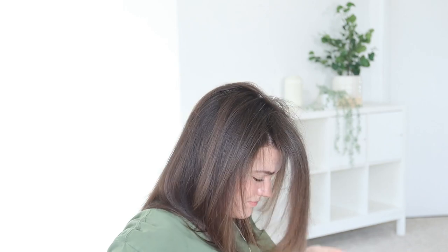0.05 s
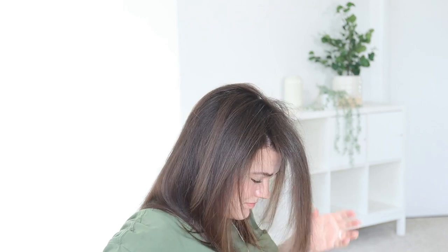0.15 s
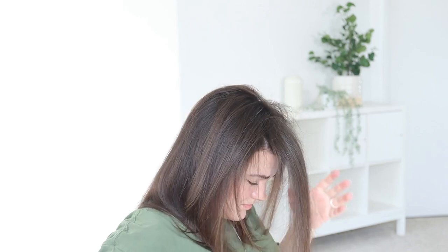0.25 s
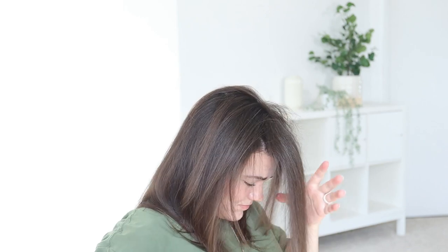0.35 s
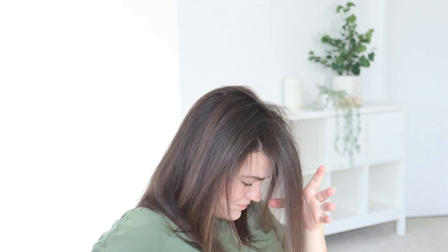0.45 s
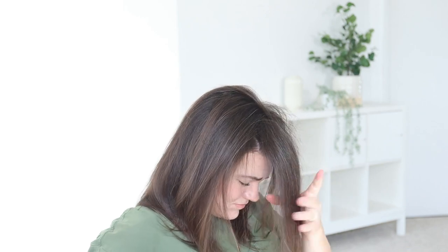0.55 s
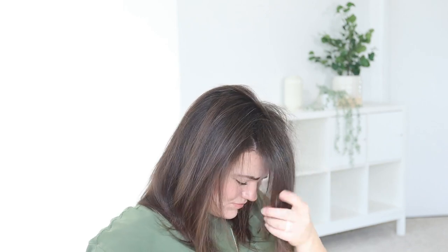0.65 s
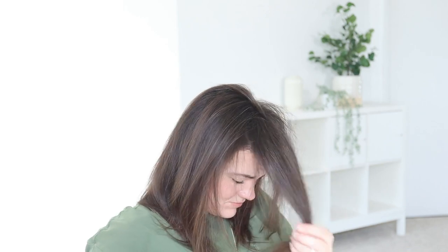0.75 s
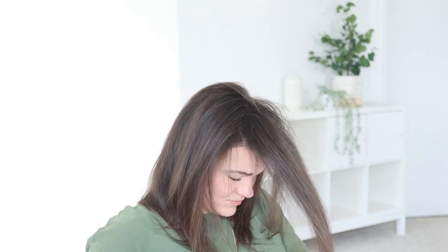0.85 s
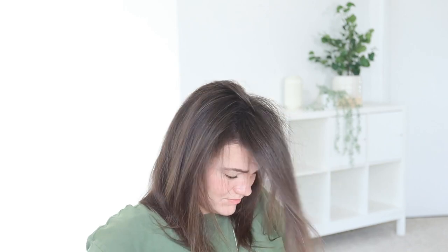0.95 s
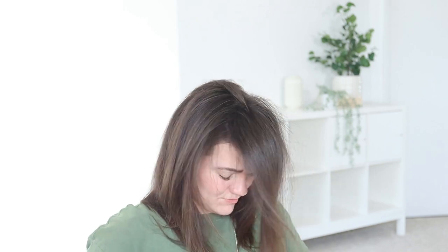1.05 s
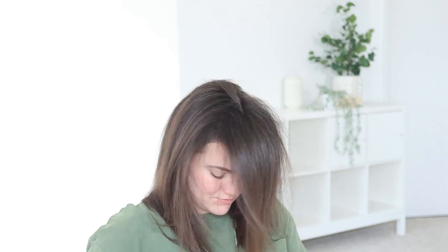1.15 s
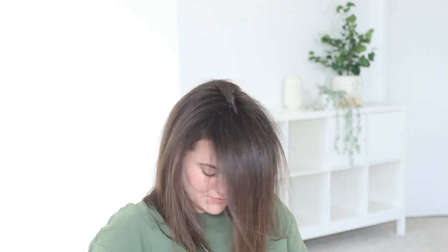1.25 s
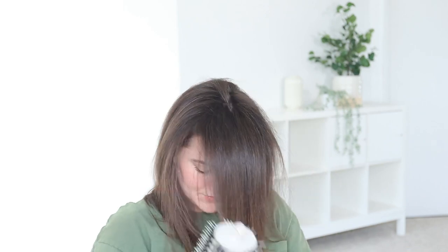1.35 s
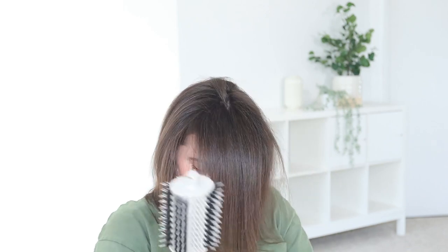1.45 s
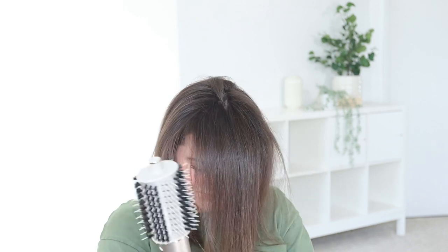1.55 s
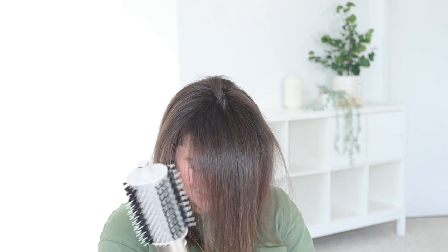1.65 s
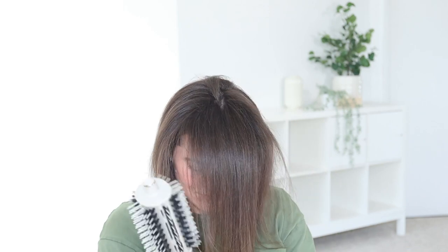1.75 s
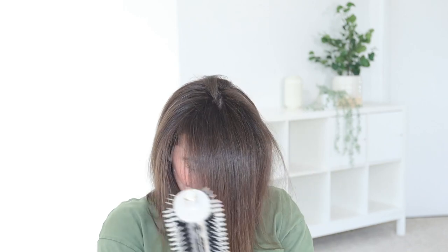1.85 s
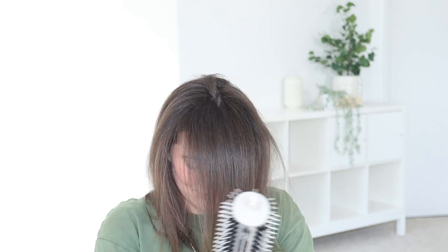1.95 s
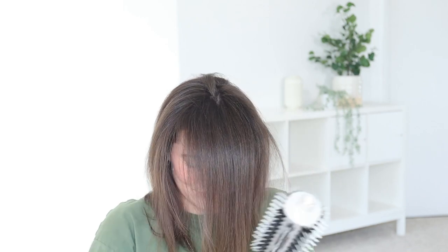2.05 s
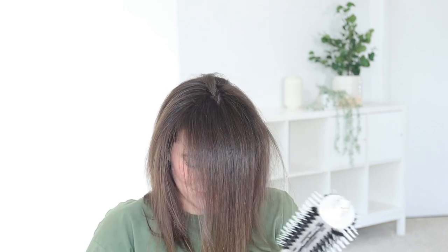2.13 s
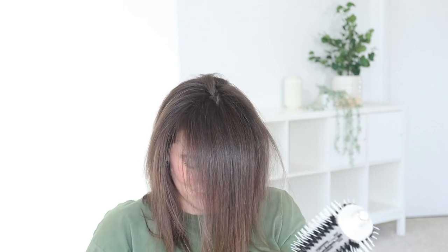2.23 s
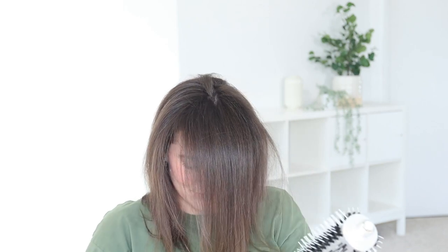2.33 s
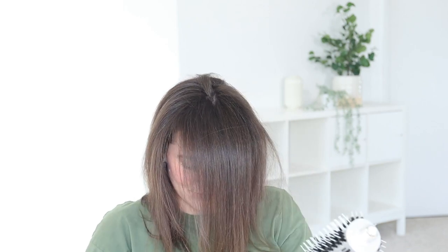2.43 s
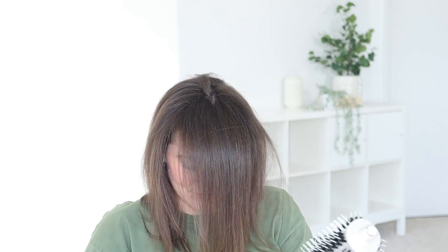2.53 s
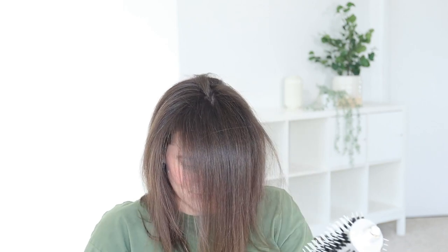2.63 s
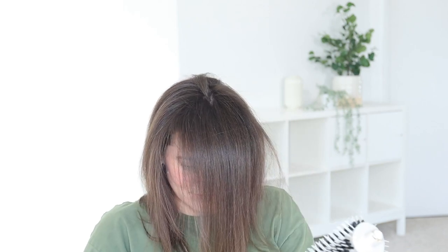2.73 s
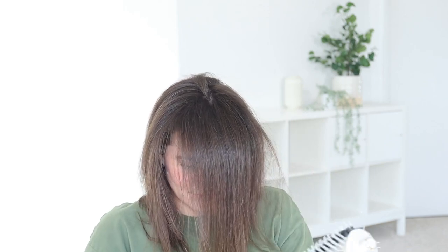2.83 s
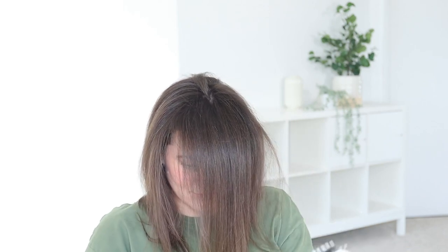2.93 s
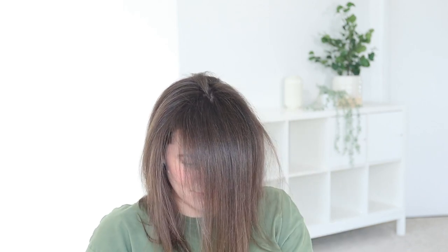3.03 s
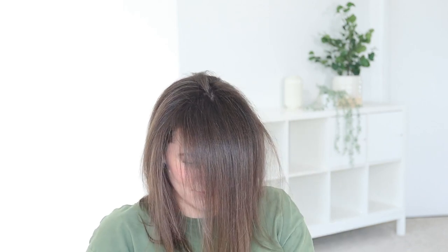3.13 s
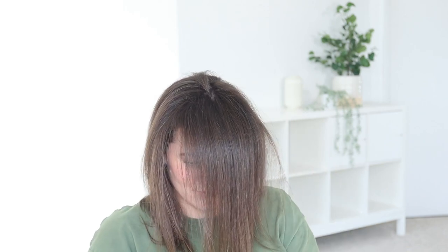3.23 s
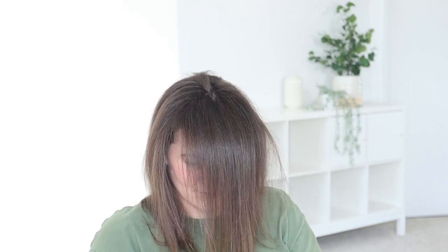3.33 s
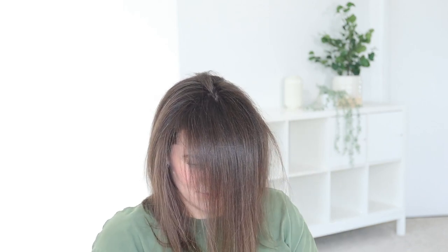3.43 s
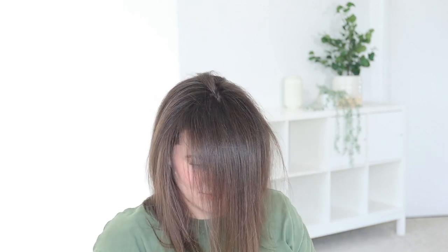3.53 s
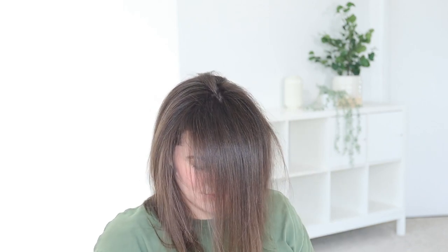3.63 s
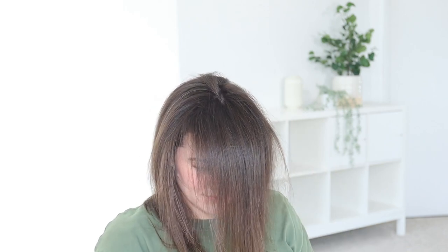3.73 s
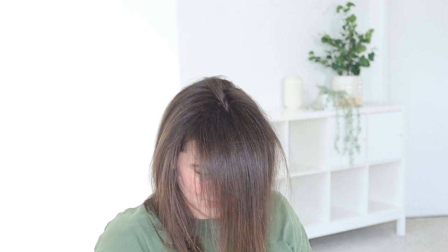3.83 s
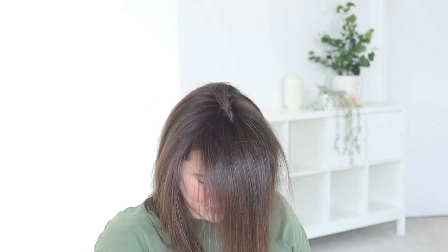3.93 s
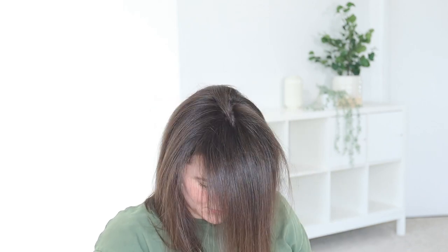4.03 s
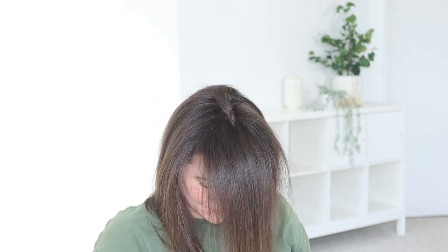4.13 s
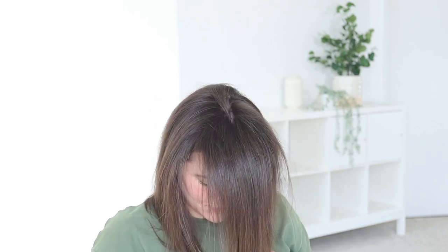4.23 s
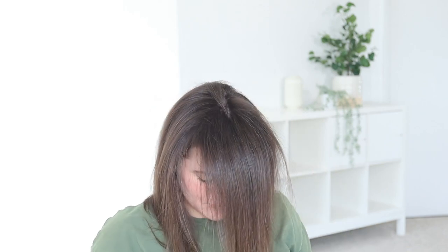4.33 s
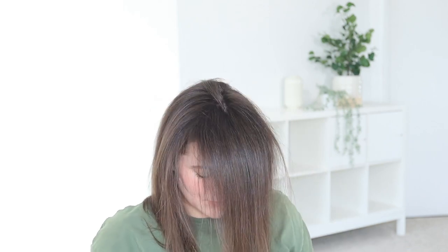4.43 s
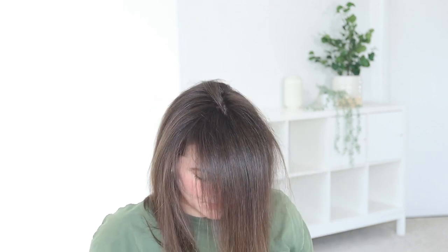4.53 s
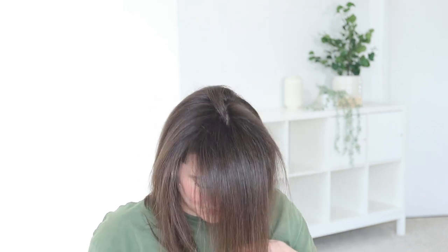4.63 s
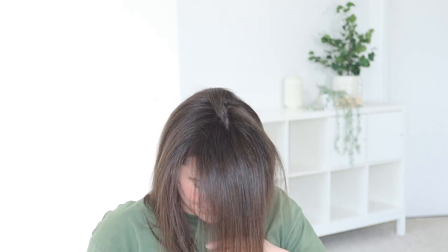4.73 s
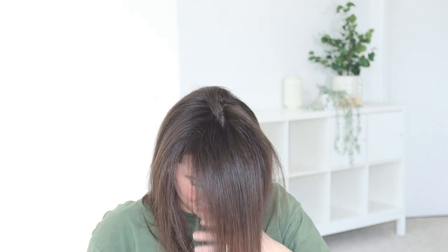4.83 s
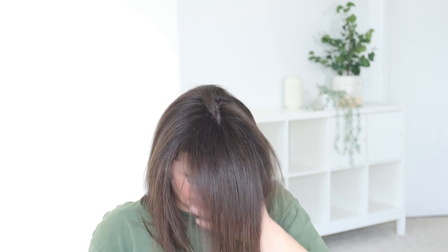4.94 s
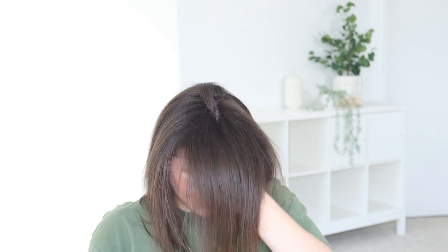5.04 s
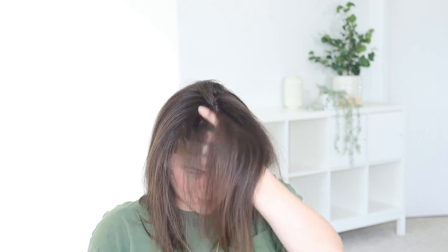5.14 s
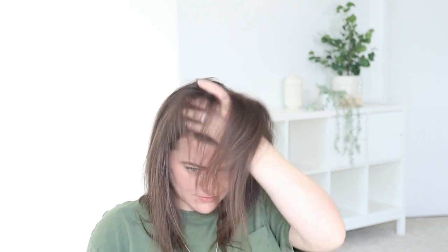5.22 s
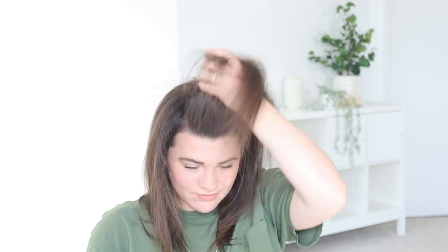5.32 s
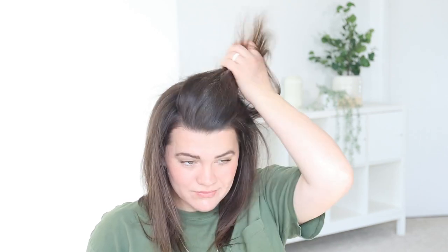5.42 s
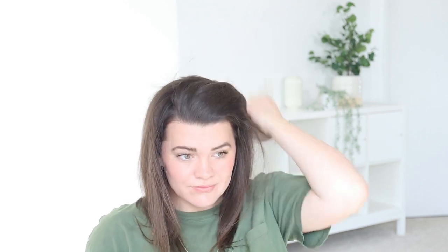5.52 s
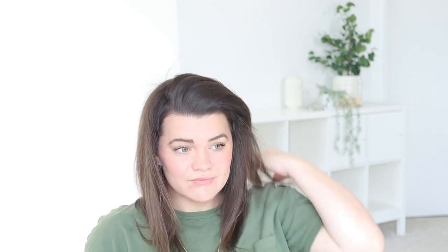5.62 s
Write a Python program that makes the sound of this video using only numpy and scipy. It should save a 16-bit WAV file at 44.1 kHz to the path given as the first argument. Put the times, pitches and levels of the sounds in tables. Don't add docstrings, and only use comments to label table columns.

```python
import sys
import numpy as np
from scipy import signal
from scipy.fft import rfft, irfft
from scipy.io import wavfile
from scipy.ndimage import uniform_filter1d

SR = 44100
rng = np.random.default_rng(int(sys.argv[2]) if len(sys.argv) > 2 else 0)


def log_audio(samples):
    frames = np.atleast_2d(samples).T
    limited = np.clip(frames, -1, 1)
    pcm = np.round(limited * 32767).astype(np.int16)
    wavfile.write(sys.argv[1], SR, pcm)


def convert_level_to_amplitude(level_db):
    exponent = np.asarray(level_db, float) / 20
    return 10 ** exponent


N = 250267
TIME_S = np.arange(N) / SR

# (time [s], level [dB], aim [-1 turned away to 1 open end facing])
STREAM = [(0.0, -34.5, -.7), (0.37, -33.5, -0.66), (0.45, -35, -0.19), (0.73, -33, -0.19),
          (1.0, -33, -0.16), (1.16, -33, -.15), (1.35, -30.5, 0.27), (1.5, -32.5, 0.73), (1.6, -33.5, 0.22),
          (1.87, -32, 0.46), (1.95, -33, 0.54), (2.2, -34.5, 0.72), (2.5, -34, 1.0), (2.72, -35, .95),
          (3.05, -42, 1.0), (3.3, -43, 0.57)]
# (time [s], half length [s], share facing [0-1])
SWEEPS = [
    (.55, .15, 0),
    (1.196, 0.46, .95),
    (1.923, 0.25, 0.57),
]
# (frequency [Hz], density [dB per Hz])
AIR_SPECTRUM = [(47, -73), (80, -43), (400, -17.5), (1030, -7), (1320, -6), (1750, -4), (2000, -3),
                (2550, 0.5), (3880, 0.5), (4630, -3.5), (5640, -16), (6440, -14.5), (12200, -26.5),
                (14200, -29), (15600, -29.5)]
# (frequency [Hz], width [Hz], height [dB])
DUCT_MODES = [(6100, 470, 3), (9600, 1350, 5), (13400, 1000, 0.5)]
# (frequency [Hz], width [Hz], height [dB])
SHADOW_MODES = [(1190, 380, -8), (1810, 690, 7.5), (3130, 120, 6), (4150, 1700, -1), (11900, 3000, -4.5)]
# (frequency [Hz], width [Hz], height [dB])
PIPE_MODES = [(596, 600, -4.5), (1034, 180, 7.5), (1350, 210, -2.5), (1767, 200, 8.5), (2070, 410, -6),
              (2760, 320, 1.5), (4060, 360, 3), (8200, 1000, 2.5), (12800, 2300, 1)]
# (frequency [Hz], width [Hz], height [dB])
VENT_MODES = [(6500, 510, 5.5), (7900, 560, 4)]
# (frequency [Hz], width [Hz], height [dB])
SLACK_MODES = [(1060, 150, 6.5), (1760, 1500, -4), (4450, 840, 7)]
# (time [s], bounce delay [s], bounce share [0-1])
LANDINGS = [
    (3.7864, .0272, .22),
    (4.0637, .0258, .88),
]
LANDING_DB = (-12, -14)
# (frequency [Hz], level [dB], t60 [s], sign [+-1])
HANDLE_MODES = [(34.5, -37, 1.2, -1), (51.7, -9.5, .11, -1), (53.8, -6.5, .13, 1), (62.6, -20.7, .3, -1),
                (93.8, -31.5, .46, -1)]
# (frequency [Hz], level [dB], t60 [s], sign [+-1])
BARREL_MODES = [(34.9, -17.7, .12, 1), (57.5, -4.5, .15, -1), (67.4, -7.7, .15, 1), (81.2, -16.5, .26, 1),
                (89.3, -22.6, .24, -1)]
# (frequency [Hz], level [dB], t60 [s])
KNOCK_MODES = [(118, -45, 0.19), (171.4, -40, 0.13), (244, -53, 0.076), (316, -56.5, 0.12),
               (432, -72, 0.056)]
# (time [s], level [dB], frequency [Hz], t60 [s])
ROCKS = [
    (4.191, -47, 71.5, 0.18),
    (4.204, -45, 54, 0.08),
    (4.279, -49, 45.3, 0.086),
]
# (time [s], level [dB], hold [s])
GROAN = [
    (3.8, -61, 0.23),
    (4.1, -54, 0.067),
]
# (frequency [Hz], density [dB per Hz])
GROAN_SPECTRUM = [(15, -7), (30, -1.5), (70, 0.5), (100, -16), (140, -34), (200, -40)]
# (time [s], peak level [dB], frequency [Hz], t60 [s])
TICKS = [(3.771, -62, 704, 0.041), (3.782, -42, 2970, .008), (3.785, -64, 900, 0.013),
         (3.806, -58, 3570, 0.0051), (3.82, -56, 3500, 0.0039), (3.871, -55, 2810, 0.0048),
         (3.925, -65, 2500, .008), (3.942, -57, 3300, 0.0035), (4.0, -55.5, 2580, 0.0087),
         (4.009, -56, 4230, .01), (4.036, -52, 2000, .008), (4.056, -62, 4970, .008),
         (4.059, -44.5, 935, 0.03), (4.07, -55, 4200, 0.008), (4.076, -48.5, 1100, 0.023),
         (4.086, -50, 2580, .03), (4.087, -61, 4500, .008), (4.134, -65, 2560, .04)]
# (frequency [Hz], density [dB per Hz])
CRACK_SPECTRUM = [(300, 2.0), (1000, 3), (3000, -0.5), (6000, -10), (11000, -30.5)]
# (time [s], level [dB], hold [s])
SCRAPE = [
    (3.782, -74, 0.0054),
    (3.83, -83, .08),
    (3.95, -73.5, 0.094),
    (4.055, -67.5, 0.037),
]
# (time [s], level [dB], hold [s])
RUSTLE = [
    (4.25, -71, 1.5),
    (4.54, -60.5, 0.13),
    (4.76, -58.5, 0.089),
    (5.02, -61, .05),
    (5.34, -59.5, 0.11),
]
# (frequency [Hz], density [dB per Hz])
CLOTH_SPECTRUM = [(150, -4.5), (400, 3), (1500, -4.5), (2500, -4.5), (4500, -9), (6000, -17), (12000, -29)]
# (time [s], level [dB], hold [s])
SLEEVE = [
    (4.56, -80, 0.11),
    (4.82, -78, .01),
]
# (frequency [Hz], density [dB per Hz])
SLEEVE_SPECTRUM = [(500, -21), (1000, -4), (1500, 8), (2400, -5), (4000, -23)]
# (frequency [Hz], density [dB per Hz])
ROOM_SPECTRUM = [(20, -7), (60, -5.5), (150, -6), (400, -7.5), (1500, -11), (4500, -15), (8000, -30)]
# (frequency [Hz], density [dB per Hz])
HISS_SPECTRUM = [(100, 8.5), (5000, -1.5), (9000, -1.5), (15000, -5)]

ROOM_DB, HISS_DB, TAIL_DB, ROOM_T60_S = -79, -83.5, -15.5, 0.5
GAIN_JUMP_S, GAIN_JUMP_DB = 3.4195, 11.5
CREEP_FROM_S, CREEP_DB_PER_S, CREEP_TOP_DB = 3.665, 6.5, 12.5
FULL_BLADE_HZ, WHINE_DB = 18900, -52
OFF_S, COAST_S = 2.851, 0.39
BRAKE_S, DIVE_PER_S, AIR_DIES_S = 3.3, 23, 0.056
VENTS_AT_REST, SHADOW_WHEN_FACING = 0.19, 0.31
LOWS_DB, PRESENCE_DB, HIGHS_DB = 1.5, 5, 1.5
SWIRL_DB, SWIRL_GROWS_DB, HOLLOW_DB, LOSS_DB = 3, 14, 5, 15
SLACK_BELOW, SLACK_LOWS_DB, SLACK_PRESENCE_DB = 0.62, 1.5, 4.5


def rms_one(x):
    return x / np.sqrt(np.mean(x ** 2) + 1e-20)


def in_time(rows, s=TIME_S):
    at_s, *columns = np.transpose(rows)
    return [np.interp(s, at_s, column) for column in columns]


def at_hz(points, hz):
    point_hz, point_db = np.transpose(points)
    return np.interp(np.log(hz + 1), np.log(point_hz), point_db)


def bumps(modes, hz):
    return sum(db / (1 + (2 * (hz - mid_hz) / wide_hz) ** 2) for mid_hz, wide_hz, db in modes)


def coloured(spectrum):
    white = rfft(rng.standard_normal(N))
    gain = convert_level_to_amplitude(at_hz(spectrum, np.fft.rfftfreq(N, 1 / SR)))
    return rms_one(irfft(white * gain, N))


def patches(shape, wide, long):
    x = rng.standard_normal(shape)
    for size, axis in ((wide, 0), (long, 1)) * 2:
        x = uniform_filter1d(x, size=size, axis=axis)
    return x / x.std()


def ring(s, hz, t60_s):
    age_s = np.maximum(TIME_S - s, 0)
    return np.sin(2 * np.pi * hz * age_s) * convert_level_to_amplitude(-60 * age_s / t60_s)


def swells(rows, rise_db_s, fall_db_s):
    gains = []
    for s, db, hold_s in rows:
        rise_db = rise_db_s * np.maximum(s - TIME_S, 0)
        fall_db = fall_db_s * np.maximum(TIME_S - s - hold_s, 0)
        gains.append(convert_level_to_amplitude(db - rise_db - fall_db))
    return np.max(gains, axis=0)


def gain_db():
    creep_db = np.clip(CREEP_DB_PER_S * (TIME_S - CREEP_FROM_S), 0, CREEP_TOP_DB)
    return GAIN_JUMP_DB * np.clip((TIME_S - GAIN_JUMP_S) / .003 + .5, 0, 1) + creep_db


def hiss():
    shared, left, right = coloured(HISS_SPECTRUM), coloured(HISS_SPECTRUM), coloured(HISS_SPECTRUM)
    return convert_level_to_amplitude(HISS_DB) * (.55 * shared + .83 * np.array([left, right]))


def rumble():
    return convert_level_to_amplitude(ROOM_DB) * coloured(ROOM_SPECTRUM)


def room(x):
    age_s = np.arange(SR // 2) / SR
    late = rng.standard_normal(len(age_s))
    dull = signal.lfilter([.45], [1, -.55], late)
    tail = dull * convert_level_to_amplitude(-60 * age_s / ROOM_T60_S) + 0.97 * late * convert_level_to_amplitude(-60 * age_s / 0.4)
    tail *= age_s > .004
    return signal.fftconvolve(x, tail / np.sqrt(np.sum(tail ** 2)))[:N]


def ports(near, stray):
    hz = np.fft.rfftfreq(N, 1 / SR)
    leak = convert_level_to_amplitude(2.0) * np.exp(-2j * np.pi * hz * 12e-6) / (1 + 1j * hz / 150)
    return np.array([near, irfft(rfft(near) * leak, N) + stray])


def rustle():
    level = swells(RUSTLE, rise_db_s=220, fall_db_s=34) * convert_level_to_amplitude(2.5 - gain_db())
    rubbing = convert_level_to_amplitude(1.0 * patches((1, N), wide=1, long=900)[0]) * coloured(CLOTH_SPECTRUM)
    sleeve = swells(SLEEVE, rise_db_s=200, fall_db_s=135) * coloured(SLEEVE_SPECTRUM)
    return level * rubbing + sleeve


def ticks():
    out, crack = np.zeros(N), coloured(CRACK_SPECTRUM)
    for s, db, hz, t60_s in TICKS:
        out += convert_level_to_amplitude(db) * ring(s, hz, t60_s)
        attack = np.clip((TIME_S - s) / 0.00099, 0, 1)
        out += convert_level_to_amplitude(db - 5) * crack * attack * convert_level_to_amplitude(-60 * np.maximum(TIME_S - s, 0) / 0.018)
    grains = convert_level_to_amplitude(2.5 * patches((1, N), wide=1, long=60)[0])
    bright = rms_one(signal.lfilter([1, -.85], [1], crack))
    return out + swells(SCRAPE, rise_db_s=350, fall_db_s=600) * grains * bright


def thumps():
    floor = swells(GROAN, rise_db_s=500, fall_db_s=85) * coloured(GROAN_SPECTRUM)
    for landing, blow_db, modes in zip(LANDINGS, LANDING_DB, (HANDLE_MODES, BARREL_MODES)):
        s, after_s, share = landing
        for hz, db, t60_s, sign in modes:
            struck = ring(s, hz, t60_s) + share * ring(s + after_s, hz, t60_s)
            floor += sign * convert_level_to_amplitude(blow_db + db) * struck
    floor += sum(convert_level_to_amplitude(db) * ring(4.0725, hz, t60_s) for hz, db, t60_s in KNOCK_MODES)
    rocking = sum(convert_level_to_amplitude(db) * ring(s, hz, t60_s) for s, db, hz, t60_s in ROCKS)
    floor += signal.sosfilt(signal.butter(4, 130, fs=SR, output="sos"), rocking)
    floor = signal.sosfilt(signal.butter(2, 700, fs=SR, output="sos"), floor)
    lead = np.gradient(floor) * SR / (2 * np.pi * 300)
    return np.array([convert_level_to_amplitude(-1.8) * (floor + lead), floor])


def fan(s, dive_per_s):
    coast = 1 / (1 + np.maximum(s - OFF_S, 0) / COAST_S)
    return coast * np.exp(-dive_per_s * np.clip(s - BRAKE_S, 0, .1))


def braked_db():
    return -60 * np.minimum(np.maximum(TIME_S - BRAKE_S, 0) / AIR_DIES_S, 2) ** 2


def whine():
    flutter = rms_one(uniform_filter1d(rng.standard_normal(N), size=200))
    heard = np.clip((TIME_S - OFF_S) / .05, 0, 1)
    phase = 2 * np.pi * np.cumsum(FULL_BLADE_HZ * fan(TIME_S, DIVE_PER_S)) / SR
    return heard * convert_level_to_amplitude(WHINE_DB + braked_db() + 2.8 * flutter) * np.sin(phase)


def air():
    hz, s, frames = signal.stft(rng.standard_normal(N), SR, nperseg=512, noverlap=384)
    aim, speed = in_time(STREAM, s)[1], fan(s, dive_per_s=6.3)
    facing = np.maximum(aim, 0)
    away = np.maximum(-aim, 0) + SHADOW_WHEN_FACING * facing ** 2
    swing = sum(share * np.exp(-((s - at_s) / half_s) ** 2) for at_s, half_s, share in SWEEPS)
    vents = VENTS_AT_REST + swing
    slack = 1 / (1 + np.exp(np.clip((speed - SLACK_BELOW) / 0.053, -30, 30)))
    blade_hz, slowed = FULL_BLADE_HZ * speed, 1 - speed

    lows_db = LOWS_DB * swing + SLACK_LOWS_DB * slack - 1.65 * facing
    presence_db = PRESENCE_DB * swing + SLACK_PRESENCE_DB * slack - 3.6 * away - 0.68
    highs_db = HIGHS_DB * swing + 0.27
    bands_db = np.array([lows_db, 0 * s, presence_db, highs_db])
    weights = [np.interp(hz, [1100, 2530, 3950, 5800], row) for row in np.eye(4)]
    colour_db = at_hz(AIR_SPECTRUM, hz)[:, None] + np.transpose(weights) @ bands_db

    hz = hz[:, None]
    colour_db += bumps(DUCT_MODES, hz) + away * bumps(SHADOW_MODES, hz) + facing * bumps(PIPE_MODES, hz)
    colour_db += vents * bumps(VENT_MODES, hz) + slack * bumps(SLACK_MODES, hz)
    above = np.log((hz + 1) / (0.728 * blade_hz))
    colour_db += (SWIRL_DB + SWIRL_GROWS_DB * 2 * slowed ** 2) * np.exp(-(above / 0.11) ** 2)
    colour_db -= LOSS_DB * slowed / (1 + np.exp(-(above - .3) / 0.11))
    colour_db -= HOLLOW_DB * np.minimum(7.2 * slowed, 1) * np.exp(-((above + 0.54) / 0.36) ** 2)
    colour_db += 0.5 * patches(frames.shape, wide=5, long=80)
    colour_db += 0.6 * patches(frames.shape, wide=40, long=12)

    gain = convert_level_to_amplitude(colour_db)
    gain /= np.sqrt(np.mean(gain ** 2, axis=0))
    stream = rms_one(signal.istft(frames * gain, SR, nperseg=512, noverlap=384)[1][:N])
    return convert_level_to_amplitude(in_time(STREAM)[0] + braked_db() + 7.0) * stream


def scene():
    styler, touches = air(), ticks()
    near = styler + whine() + convert_level_to_amplitude(TAIL_DB) * room(styler) + touches + rustle()
    stray = convert_level_to_amplitude(-54) * room(styler + touches)
    return ports(near + rumble(), stray) + thumps() + hiss()


def roll_off(x):
    return signal.sosfilt(signal.butter(12, 15710, fs=SR, output="sos"), x)


def record(dry):
    mix = dry * convert_level_to_amplitude(gain_db())
    return roll_off(mix)


dry = scene()
out = record(dry)
log_audio(out)
```